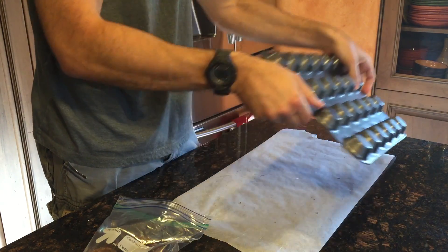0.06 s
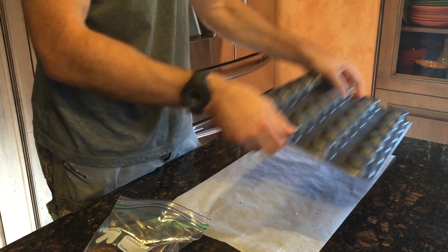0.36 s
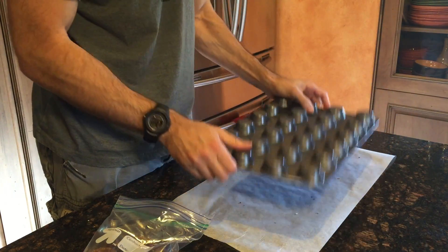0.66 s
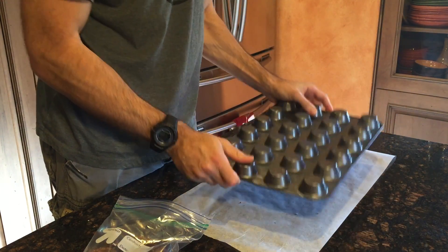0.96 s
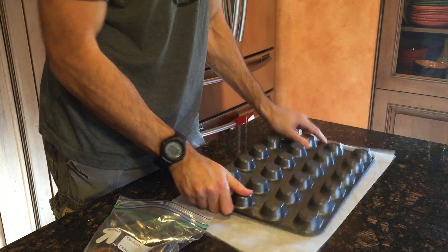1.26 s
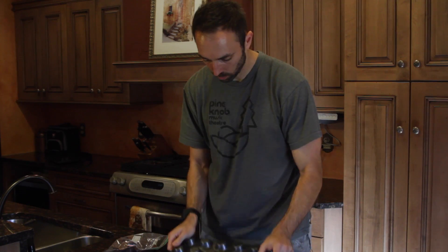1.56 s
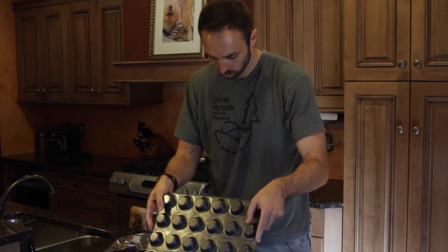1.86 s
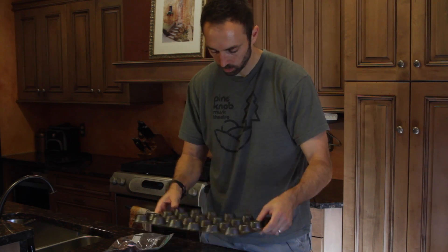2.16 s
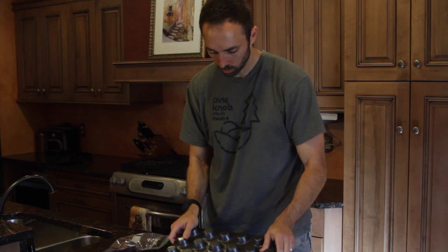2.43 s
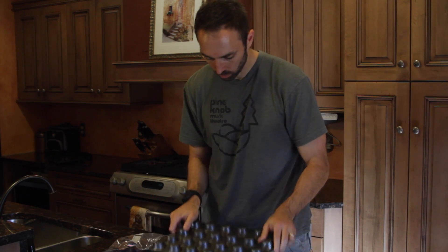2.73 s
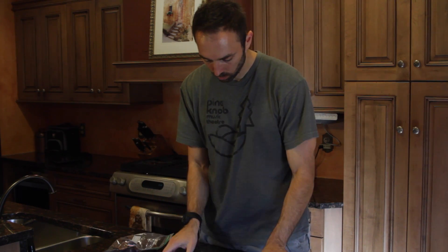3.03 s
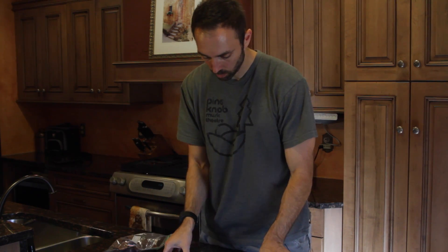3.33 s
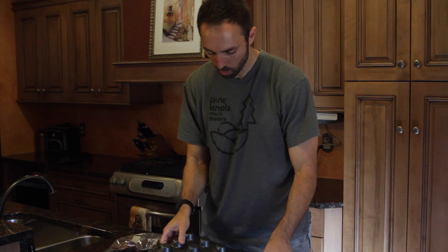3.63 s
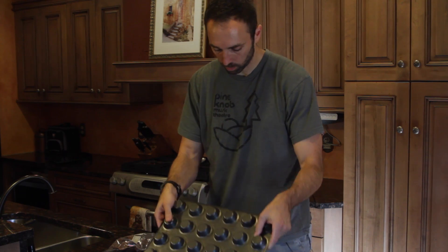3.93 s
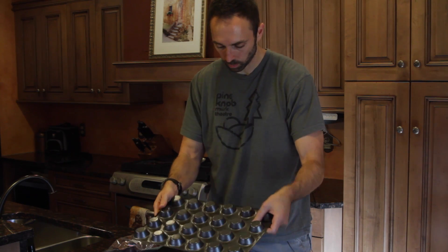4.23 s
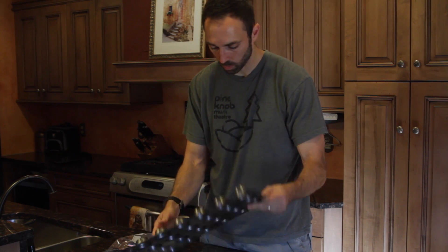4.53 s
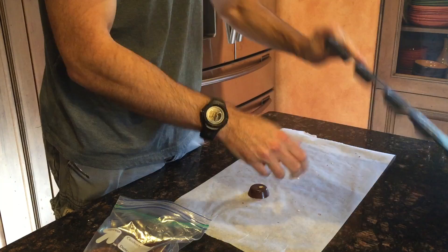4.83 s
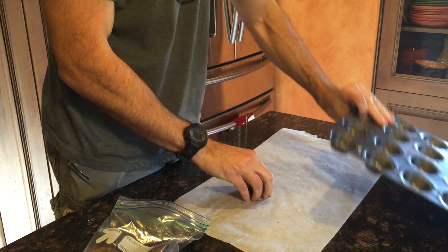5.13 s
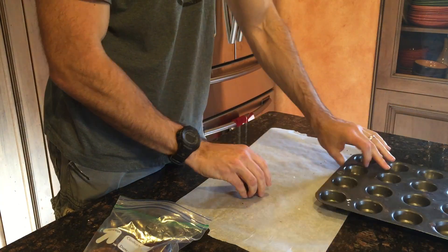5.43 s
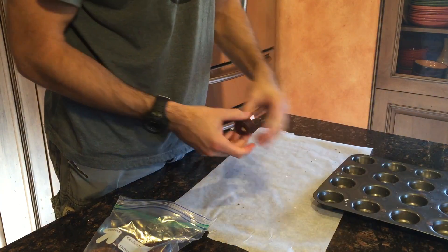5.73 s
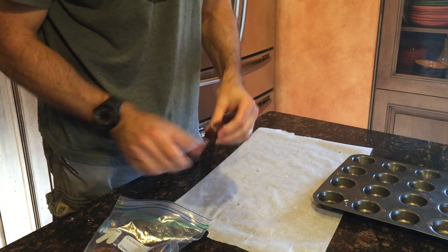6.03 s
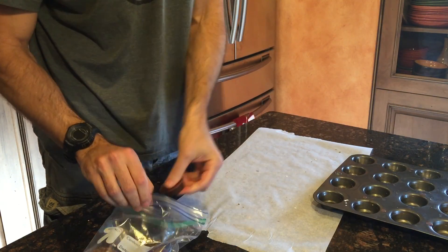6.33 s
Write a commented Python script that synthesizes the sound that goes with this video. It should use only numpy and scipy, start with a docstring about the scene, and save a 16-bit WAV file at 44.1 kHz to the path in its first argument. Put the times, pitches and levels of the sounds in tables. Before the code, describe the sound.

A faint appliance hum and barely audible fingers sliding on steel open the scene in a hard-walled kitchen. At about 1.3 seconds a steel muffin tin bangs flat onto baking paper on a stone counter, with a dense clatter, a low thud, clear ringing tones and a couple of duller bounces. At 2.9 seconds it slams down again, harder, clattering in quick rebounds, and the paper rustles briefly around 3.2 seconds. These two blows overload the microphone and leave a short echo. Very faint finger rubbing and small paper ticks follow. Near 5 seconds the tin is knocked on its edge, a brighter, thinner clang with a few quick bounces. At 5.5 seconds it is laid down, sliding and rattling lightly to rest, with one more soft tap at 5.7. From about 6.3 seconds a plastic bag crinkles quietly.

```python
"""Muffin tin on a stone counter

A steel muffin tin is knocked on baking paper on the counter: twice flat, once on its edge, then it
is laid down and rattles to rest. Each blow sets off a dense clatter and clear ringing tones in a
hard-walled kitchen, and the loudest overload the microphone. Fingers slide on the tin, the paper
rustles, a plastic bag crinkles at the end, and an appliance hums."""
import sys
import numpy as np
from scipy import signal
from scipy.fft import rfft, irfft
from scipy.io import wavfile

SR = 44100
rng = np.random.default_rng(int(sys.argv[2]) if len(sys.argv) > 2 else 0)


def transcribe(u):
    """Save the signal u as a 16-bit wav file named by the first command-line argument.

    u: samples, shape (n,) or (channels, n), limited to [-1, 1]; the rate is SR.
    q: integer samples, one column per channel.
    """
    v = np.clip(np.atleast_2d(u).T, -1, 1)
    q = np.round(v * 32767).astype(np.int16)
    wavfile.write(sys.argv[1], SR, q)


N = 290157
T = np.arange(N) / SR
SECOND = T[:SR]


def from_db(db):
    """Turn decibels into a volume factor."""
    return 10 ** (np.asarray(db) / 20)


def unit_power(x):
    """Scale a sound to an average power of one."""
    return x / np.sqrt(np.mean(x ** 2) + 1e-20)


def at_hz(points, hz):
    """Read between a table's rows, giving each octave equal space."""
    pitches, values = np.transpose(points)
    return np.interp(np.log(np.maximum(hz, 1)), np.log(pitches), values)


def decay(fade_s):
    """One second of dying away. A fade time is how long a sound takes to fall by 60 dB."""
    return np.exp(-np.log(1000) * SECOND / max(fade_s, 1e-4))


def envelope(peak_s, rise_s, hold_s, fade_s):
    """Swell to full level, hold, then die away."""
    rise = np.clip(1 + (T - peak_s) / max(rise_s, 1e-3), 0, 1) ** 2
    return rise * np.exp(-np.log(1000) * np.clip((T - peak_s - hold_s) / max(fade_s, 1e-3), 0, 10))


def add(out, start_s, sound):
    """Mix a sound in at the given time."""
    i = round(start_s * SR)
    out[i:i + len(sound)] += sound[:N - i]


def colour(x, spectrum, size=4096):
    """Shape the balance of low and high pitches; white noise keeps its power."""
    cepstrum = irfft(np.log(from_db(at_hz(spectrum, np.fft.rfftfreq(size, 1 / SR)))))
    # minimum phase: the filter never sounds before it is struck
    cepstrum[1:size // 2] *= 2
    cepstrum[size // 2 + 1:] = 0
    response = irfft(np.exp(rfft(cepstrum)))
    return signal.fftconvolve(x, response / np.linalg.norm(response))[:len(x)]


def noise_band(length, low_hz, high_hz, order=2):
    """Noise between two pitches."""
    bandpass = signal.butter(order, [low_hz, min(high_hz, .45 * SR)], "band", fs=SR, output="sos")
    return signal.sosfilt(bandpass, rng.standard_normal(length))


def burst(spectrum, fade_s):
    """Tones too crowded to tell apart, struck at once, sound like fading noise."""
    fall = decay(fade_s)
    sound = colour(rng.standard_normal(SR) * fall, spectrum)
    return sound * np.linalg.norm(fall) / np.linalg.norm(sound)


# the appliance's tones: (pitch [Hz], level [dB])
HUM_TONES = [(49, -65), (198, -78)]


def appliance():
    """An appliance hums with steady low tones."""
    return sum(from_db(db) * np.sqrt(2) * np.sin(2 * np.pi * (hz * T + rng.random()))
               for hz, db in HUM_TONES)


# the tone colour of the air: (pitch [Hz], relative level [dB])
AIR_COLOUR = [(20, -8), (45, -5.5), (80, -17), (130, -14.5), (165, -17), (205, -13), (260, -19), (340, -19),
              (1000, -27.5), (1600, -36), (3200, -40), (16000, -47)]


def room_air(level_db=-65):
    """Still room air is a faint, low rush."""
    return from_db(level_db) * colour(rng.standard_normal(N), AIR_COLOUR)


# the tin's clear tones (modes), and their relative strength for three ways of landing:
# (pitch [Hz], fade time [s], flat [dB], on its edge [dB], on its rim [dB])
TIN_TONES = [(564, .45, -4, -30, -19), (654, .45, -11, -30, -2), (776, .55, -3, -27, -18),
             (868, .4, -5, -17, -1), (932, .45, -2, -21, -16), (1153, .52, -3, -28, -11),
             (1211, .45, -3, -16, -18), (1238, 1.6, -25, -36, -30), (1325, .48, -3, -15, -8),
             (1455, .7, -9, -8, -19), (1511, .45, 0, -27, -14), (1585, .6, -7, -8, 0),
             (1620, .48, -1, -14, -6), (1680, .5, -15, -12, -19), (1744, .45, -7, -11, -13),
             (2270, .6, -26, -19, -4), (2364, .52, -11, -8, -4), (2444, .52, -19, 0, -6),
             (2592, .6, -17, -3, -7), (2668, .6, -14, -10, -14), (2778, .45, -19, -6, -14),
             (2831, .5, -15, -8, -12), (2908, .4, -6, -12, -9), (3690, .5, -16, -18, -31),
             (3712, .5, -30, -22, -17), (4186, .5, -30, -28, -22), (4382, .42, -25, -15, -30),
             (4662, .5, -18, -16, -17), (5238, .45, -22, -17, -39), (5900, .36, -19, -15, -43)]


def tin_tones():
    """The steel vibrates in fading tones: two seconds of each, as complex waves (.imag is the sound)."""
    hz, fade_s = np.transpose(TIN_TONES)[:2]
    return np.exp((2j * np.pi * hz - np.log(1000) / fade_s)[:, None] * T[:2 * SR])


# the hiss of skin on steel: (pitch [Hz], relative level [dB])
RUB_COLOUR = [(400, -20), (1400, -3.5), (2000, -10), (2650, 2.5), (3400, -17), (4700, 1), (6000, -4.5),
              (7000, -14), (16000, -19)]
# finger strokes: (middle time [s], length [s], level [dB])
FINGER_STROKES = [(0.096, 0.36, -75.5), (0.388, .22, -76), (0.853, .18, -76), (1.87, 0.22, -75),
                  (2.16, 0.28, -72.5), (2.38, .22, -75), (3.716, 0.83, -69.5), (4.29, .2, -67),
                  (4.48, .3, -71), (4.867, 0.14, -78)]


def fingers(sing_db=-5, grip_db=2.5, grips_per_s=45):
    """Skin grips and slips unevenly on steel: it hisses and makes the liveliest tones sing faintly."""
    hz = np.array(TIN_TONES)[:, 0]
    lively = (hz > 2300) & (hz < 2900) | (hz > 4300) & (hz < 4700)
    lively_ring = tin_tones()[lively].imag.sum(0)
    singing = signal.fftconvolve(rng.standard_normal(N + SR), lively_ring)[SR:SR + N]
    hiss = colour(rng.standard_normal(N), RUB_COLOUR)
    # each stroke swells and eases off
    strokes = sum(from_db(db) * np.cos(np.pi * np.clip((T - middle_s) / length_s, -.5, .5))
                  for middle_s, length_s, db in FINGER_STROKES)
    grip = from_db(grip_db * np.interp(T * grips_per_s, np.arange(SR), rng.standard_normal(SR)))
    return strokes * grip * (hiss + from_db(sing_db) * unit_power(singing))


def cushion_db(hz, bright_hz):
    """A cushioned blow stirs the tin less at pitches above bright_hz."""
    return -10 * np.log10(1 + (hz / bright_hz) ** 2)


# the clatter's tone colour for each way of landing: (pitch [Hz], relative level [dB])
CLATTER_COLOURS = { "flat": [(70, -29.5), (280, -21.5), (440, -8.5), (600, 7), (1200, 1.5), (1600, -3.5),
                   (2100, -16.5), (2650, -1), (3200, -20), (4100, -19.5), (4900, -10.5), (6800, -15),
                   (11500, -13), (16000, -17)], "slam": [(70, -25.5), (250, -17.5), (400, -1.5), (600, 0.5),
                   (1000, 3), (1550, 6.5), (2050, -13.5), (2650, -0.5), (3200, -14), (4100, -12),
                   (4900, -3.5), (6800, -13), (11500, -17), (16000, -17.5)], "edge": [(150, -33),
                   (350, -18.5), (700, -8.5), (1000, -11.5), (1650, -3), (2100, -11), (2400, -1), (2830, 0),
                   (3250, -18), (4300, -9.5), (5700, -13.5), (6500, -26), (8200, -20.5), (11000, -37),
                   (16000, -36.5)], "rim": [(100, -47.5), (430, -16.5), (630, 2), (870, -1), (1050, -3),
                   (1600, -1.5), (2150, -2.5), (2850, 0.5), (3450, -19.5), (4050, -22.5), (4800, -9.5),
                   (5400, -23), (7000, -34), (14000, -48)], "nudge": [(100, -50), (430, -16), (600, 8),
                   (760, 0), (1000, -2.5), (1600, -13), (2100, -40), (2700, -28), (3400, -18),
                   (4700, -12.5), (6000, -31), (14000, -33)]}
# the cups ring in clusters that lift the clatter: (pitch [Hz], width [Hz], boost [dB])
CUP_CLUSTERS = [(3690, 87, 7), (4570, 170, 9.5), (5290, 80, 5), (5940, 110, 10.5)]


def clatter(landing, bright_hz, fade_s):
    """One blow shakes all the tin's crowded tones at once."""
    hz = np.geomspace(30, 18000, 600)
    cups_db = sum(db * np.exp(-((hz - centre) / width) ** 2) for centre, width, db in CUP_CLUSTERS)
    colour_db = at_hz(CLATTER_COLOURS[landing], hz) + cups_db + cushion_db(hz, bright_hz)
    return burst(np.c_[hz, colour_db], fade_s)


# how freely the clear tones ring for each way of landing: (level change [dB])
RING_FREEDOM = {"flat": -21, "slam": -19.5, "nudge": -18, "edge": -9.5, "rim": -12.5}


def ringing(tones, landing, bright_hz):
    """The way of landing and the blow's brightness set how strongly each clear tone rings."""
    hz, _, flat, edge, rim = np.transpose(TIN_TONES)
    tone_db = {"flat": flat, "slam": flat, "nudge": flat, "edge": edge, "rim": rim}[landing]
    strengths = from_db(RING_FREEDOM[landing] + tone_db + cushion_db(hz, bright_hz))
    phases = np.exp(2j * np.pi * rng.random(len(hz)))   # each wave starts at a random point
    return ((strengths * phases) @ tones).imag


# tin meets counter: (time [s], level [dB], brightness [Hz], clatter fade time [s], way of landing)
TIN_BLOWS = [(0.863, -51.5, 5000, 0.055, "edge"), (1.198, -52, 6000, 1, "edge"),
             (1.257, -31, 7020, 0.056, "edge"), (1.3222, 1, 2220, 0.06, "flat"),
             (1.340, -15, 2500, 0.25, "flat"), (1.4510, -6.5, 1000, 0.024, "flat"),
             (1.5297, -17.5, 400, 0.018, "flat"), (2.8838, -4.5, 3490, .11, "slam"),
             (2.893, 3, 6000, 0.041, "slam"), (2.92, -12.5, 1970, 0.099, "slam"),
             (2.936, -6, 2070, 0.089, "slam"), (2.975, -9.5, 2000, 0.13, "slam"),
             (3.108, -29.5, 696, 0.043, "slam"), (3.488, -45.5, 2000, 0.1, "nudge"),
             (3.6148, -40, 3000, 0.1, "nudge"), (4.9622, -6, 6000, 0.1, "edge"),
             (4.984, -15, 3020, 0.068, "edge"), (5.025, -11.5, 5020, 0.072, "edge"),
             (5.092, -14.5, 3490, 0.049, "edge"), (5.706, -32.5, 1803, 0.05, "rim"),
             (5.8438, -43.5, 602, 0.044, "rim"), (6.080, -53.5, 1200, 0.078, "nudge")]


def tin_knocks():
    """Every blow, and every touch of the rattle, makes the tin clatter and ring; returns both sounds."""
    clatters, rings, tones = np.zeros(N), np.zeros(N), tin_tones()
    for start_s, db, bright_hz, fade_s, landing in TIN_BLOWS + rattle_touches():
        add(clatters, start_s, from_db(db) * clatter(landing, bright_hz, fade_s))
        add(rings, start_s, from_db(db) * ringing(tones, landing, bright_hz))
    return clatters, rings


# how long the kitchen echoes: (pitch [Hz], fade time [s])
ECHO_FADES = [(80, .3), (250, .42), (600, .56), (1200, .58), (5000, .51), (7000, .44), (10000, .36),
              (15000, .28)]
# how strongly it echoes: (pitch [Hz], relative level [dB])
ECHO_LEVELS = [(90, -22.5), (200, -13), (400, -8.5), (1500, -2.5), (5000, -5.5), (9000, -2.5),
               (14000, -4.5)]


def kitchen_echo(x, build_s=.0073):
    """Hard walls return a wash of echo that builds quickly and dies sooner in the treble."""
    echo, edges = np.zeros(SR), np.geomspace(30, 18000, 24)
    build_up = 1 - np.exp(-SECOND / build_s)
    for low, high in zip(edges, edges[1:]):
        hz = np.sqrt(low * high)
        tail = noise_band(SR, low, high, order=3) * decay(at_hz(ECHO_FADES, hz)) * build_up
        band_share = np.sqrt(2 * (high - low) / SR)
        echo += tail / np.linalg.norm(tail) * band_share * from_db(at_hz(ECHO_LEVELS, hz))
    return signal.fftconvolve(x, echo)[:N]


# paper, later the bag, is pressed ever harder and let go: (release time [s], build-up [s], level [dB])
PRESSES = [(1.315, .16, -47.5), (3.188, .045, -36), (3.475, 0.035, -51.5), (6.44, 0.41, -66),
           (6.48, 0.034, -50.5), (6.575, .03, -50)]
# the tone colour of the crinkling: (pitch [Hz], relative level [dB])
CRINKLE_COLOUR = [(300, -5.5), (1500, 6), (4000, 2), (7000, -8.5), (11000, -14), (16000, -12.5)]


def crinkling(folds_per_s=5000, spread_db=3):
    """Paper and plastic rustle as many tiny folds of uneven size give way."""
    sizes = from_db(spread_db * np.minimum(rng.exponential(1, N), 4))
    directions = rng.choice([-1, 1], N)
    folds = unit_power(sizes * directions * (rng.random(N) < folds_per_s / SR))
    pressure = sum(from_db(db) * envelope(release_s, build_s, hold_s=0, fade_s=.08)
                   for release_s, build_s, db in PRESSES)
    return colour(folds * pressure, CRINKLE_COLOUR)


def corner_squeak(level_db=-52.5):
    """A corner catches as it drags, squeaking at one pitch just before the first hard blow."""
    squeak = unit_power(noise_band(N, low_hz=2840, high_hz=2871))
    return from_db(level_db) * envelope(peak_s=1.198, rise_s=.012, hold_s=.1, fade_s=.04) * squeak


# snaps of paper and plastic: (time [s], level [dB], pitch [Hz])
CREASE_SNAPS = [(1.26, -31.5, 8300), (2.532, -59, 6280), (3.182, -42, 7070), (3.247, -49, 8990),
                (4.659, -52.5, 8500), (4.732, -48.5, 3308), (4.828, -51.5, 1498), (6.331, -44.5, 1900),
                (6.4196, -49, 3440), (6.4654, -46, 6000), (6.4880, -50, 7000), (6.5675, -42, 2980)]


def crease_snaps(fade_s=.014):
    """A larger crease gives way with a sharp tick, an octave wide."""
    out = np.zeros(N)
    for start_s, db, hz in CREASE_SNAPS:
        tick = unit_power(noise_band(SR, hz / np.sqrt(2), hz * np.sqrt(2))) * decay(fade_s)
        add(out, start_s, from_db(db) * tick)
    return out


# the counter takes the tin's weight: (time [s], level [dB])
THUDS = [(1.3213, -16), (2.888, -17.5), (2.896, -15), (2.921, -20), (4.964, -40.5)]
# the tone colour of a thud: (pitch [Hz], relative level [dB])
THUD_COLOUR = [(20, -2), (40, -3), (65, -5.5), (100, 2.5), (180, -5), (300, -3.5), (600, -32), (2000, -62)]


def counter_thuds(fade_s=.1):
    """The stone slab and its cabinet thud under the hard blows."""
    out = np.zeros(N)
    for start_s, db in THUDS:
        add(out, start_s, from_db(db) * burst(THUD_COLOUR, fade_s))
    return out


LAID_DOWN_S = 5.4928


def rattle_touches(count=6, gap_s=.026, first_db=-28.5, loss_db=.56, bright_hz=4540, fade_s=.12):
    """Laid down, the tin rocks on its rim in an even run of weakening touches, listed as more blows."""
    return [(LAID_DOWN_S + k * gap_s, first_db - k * loss_db, bright_hz, fade_s, "rim")
            for k in range(count)]


# the hiss of steel on stone: (pitch [Hz], relative level [dB])
SKID_COLOUR = [(400, -10), (800, 1), (3000, -2.5), (4000, -20), (4800, 3), (6500, -22), (9500, -25),
               (11800, -17), (14000, -33), (16000, -37)]


def skid(level_db=-47):
    """The tin slides while it rocks, and the dragged steel hisses."""
    hiss = colour(rng.standard_normal(N), SKID_COLOUR)
    return from_db(level_db) * envelope(LAID_DOWN_S, rise_s=.008, hold_s=.067, fade_s=.17) * hiss


def scene(snap_echo_db=-5):
    """All the sounds in the kitchen meet at one microphone."""
    clatters, rings = tin_knocks()
    direct = clatters + counter_thuds() + crinkling() + skid() + corner_squeak()
    snaps = crease_snaps()
    # the snaps are close by, so they echo less; the ringing's fade times already include the room
    echo = kitchen_echo(direct + from_db(snap_echo_db) * snaps)
    return (direct + snaps + echo + rings + fingers() + appliance() + room_air())[None]


def record(dry, ceiling=.8, cutoff_hz=16000):
    """The overloaded microphone flattens the loudest swings, then the highest treble is cut."""
    flattened = dry / (1 + (dry / ceiling) ** 4) ** (1 / 4)
    lowpass = signal.ellip(10, .1, 80, cutoff_hz, fs=SR, output="sos")
    return signal.sosfilt(lowpass, flattened)


dry = scene()
out = record(dry)
transcribe(out)
```